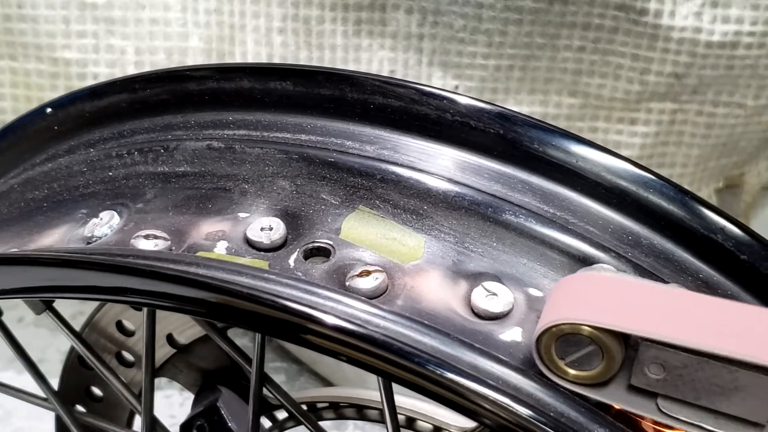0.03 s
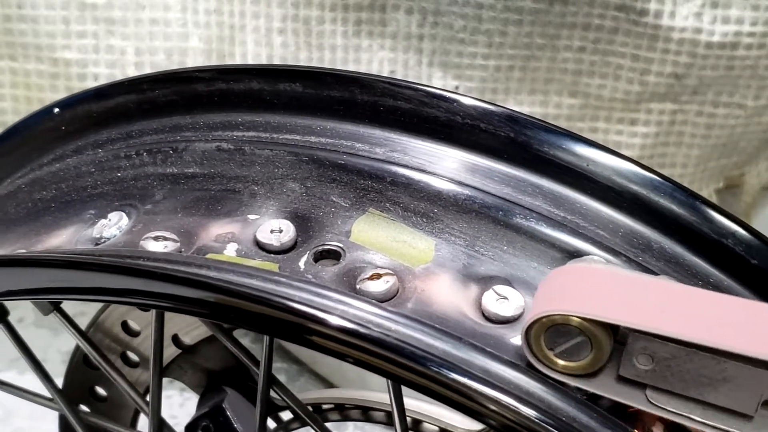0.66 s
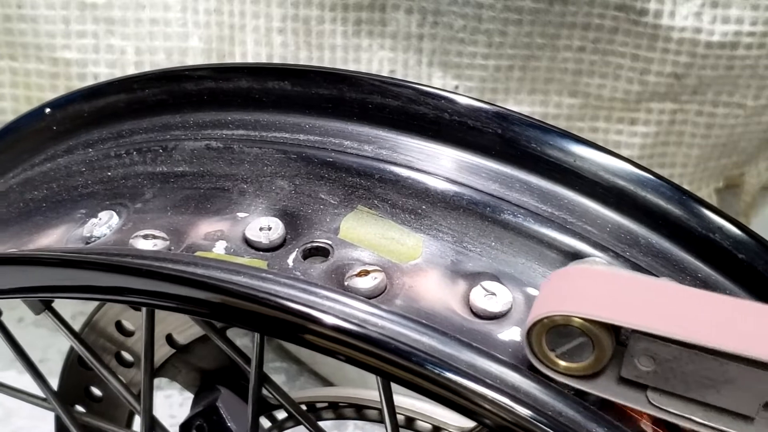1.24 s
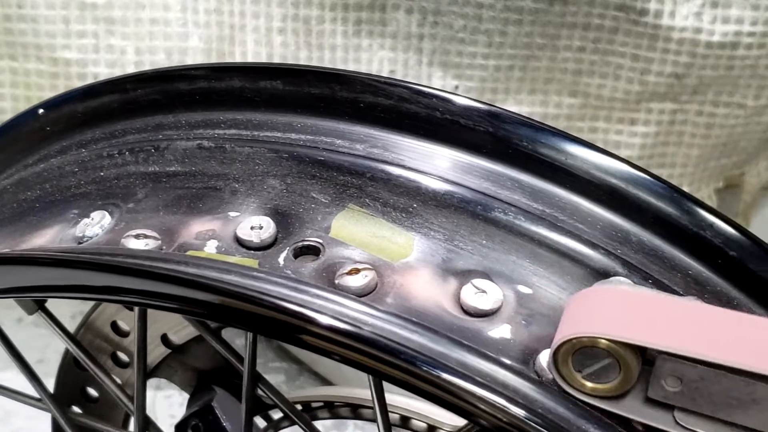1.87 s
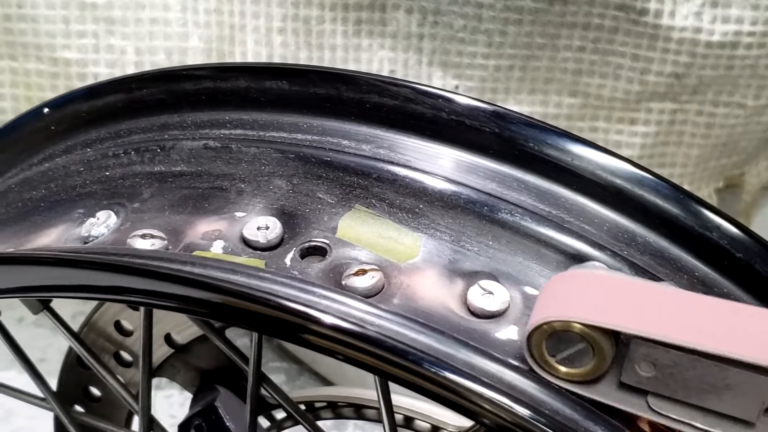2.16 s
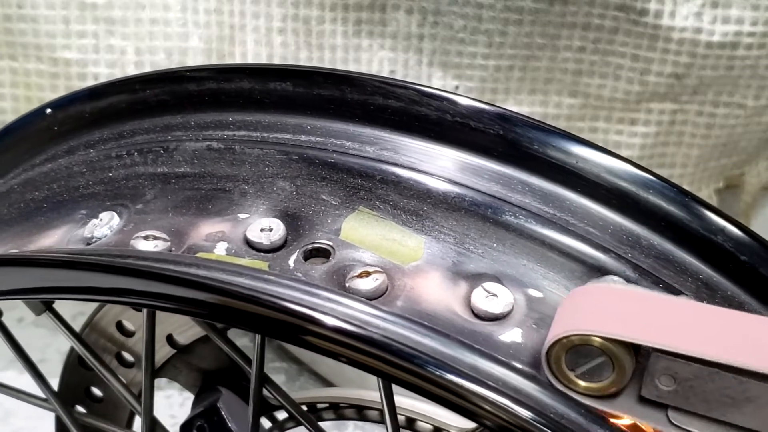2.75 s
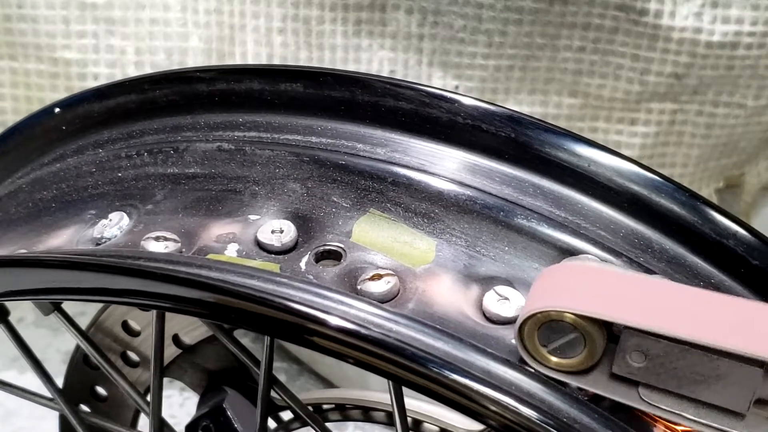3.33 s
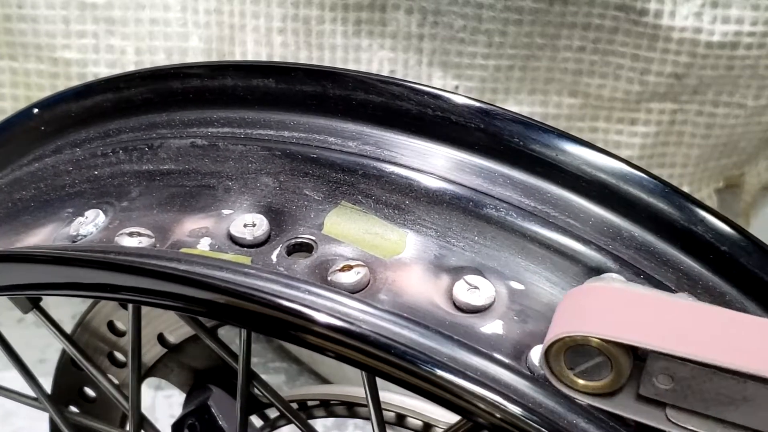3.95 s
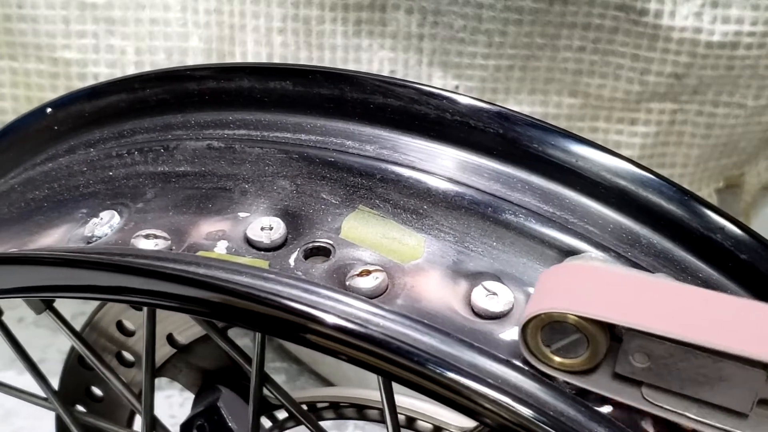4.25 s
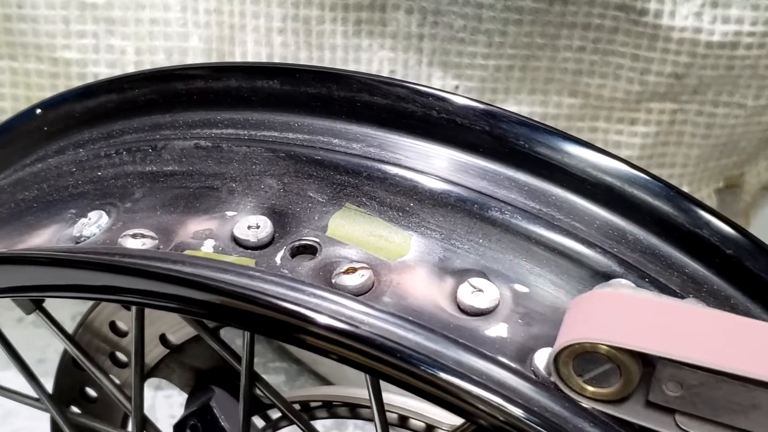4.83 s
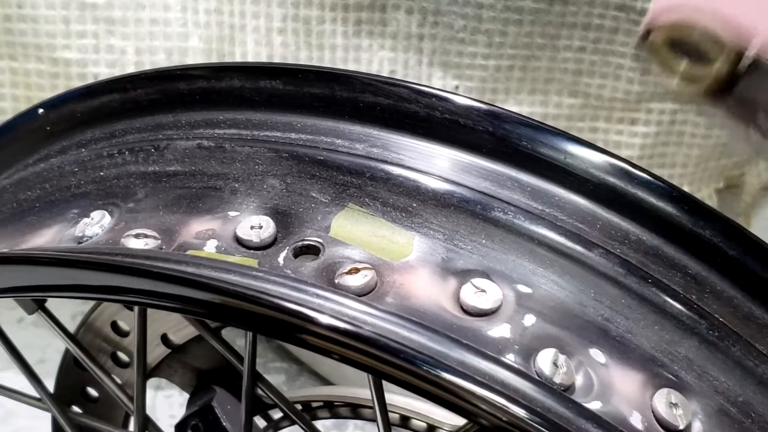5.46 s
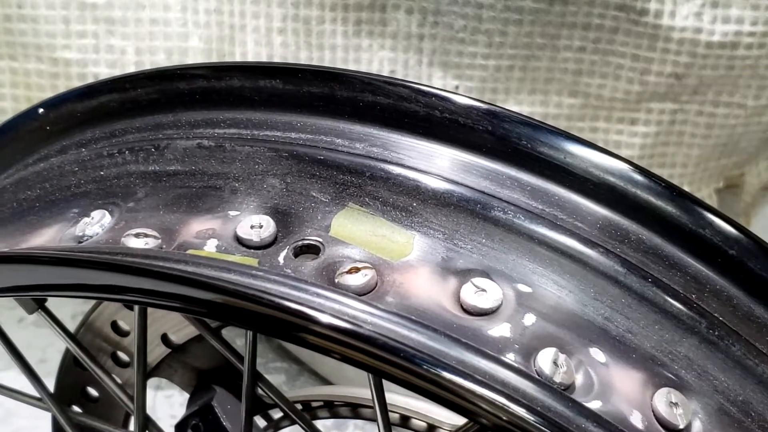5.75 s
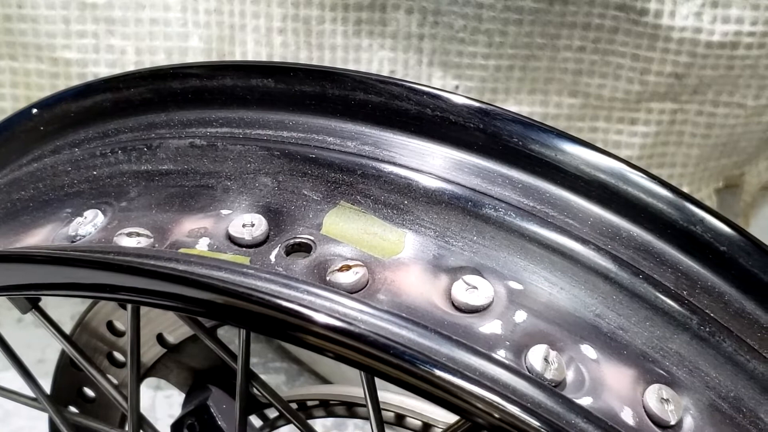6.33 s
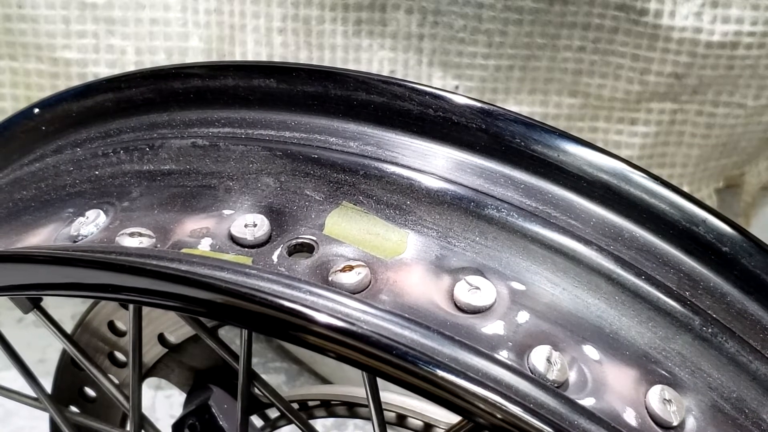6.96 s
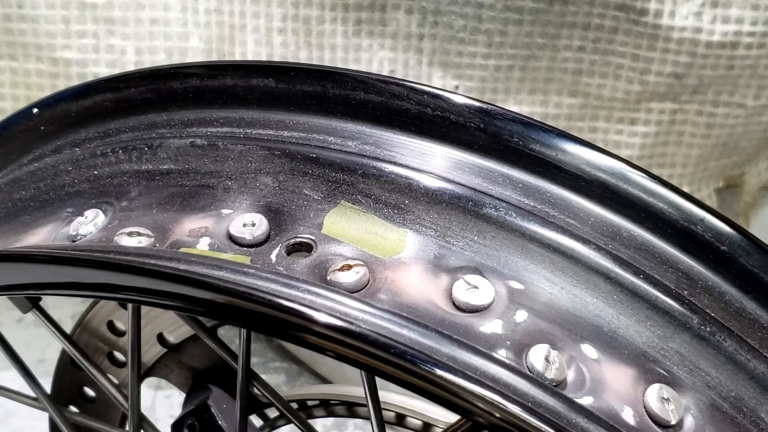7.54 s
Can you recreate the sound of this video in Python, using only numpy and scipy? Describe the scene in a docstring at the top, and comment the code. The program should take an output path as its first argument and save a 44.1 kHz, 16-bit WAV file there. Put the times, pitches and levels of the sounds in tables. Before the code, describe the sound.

In a workshop, a hand-held air belt sander grinds steel spoke heads in a wheel rim, close to the microphone. It hisses and scrapes in uneven strokes, with metallic ringing and a few thin squeals, while the motor's whine sinks under load. After about five seconds the belt lifts and the motor stops with a brief hoot. A fan drones on behind, slowly growing louder.

```python
"""A workshop, in stereo: a hand-held air belt sander close to the microphone, a fan droning behind it.
From the start the vane motor whines and buzzes, the exhaust rushes, and the belt grinds steel spoke
heads in a motorcycle rim. With each stroke the grit scrapes and the steel rings; the motor sags under
load. At 5.2 s the belt is lifted off, then the trigger is let go and the motor runs down with a brief
hoot. From 5.9 s the recorder's automatic gain recovers, lifting the steady fan drone."""
import sys
import numpy as np
from scipy import signal
from scipy.fft import rfft, irfft
from scipy.io import wavfile

SR = 44100
rng = np.random.default_rng(int(sys.argv[2]) if len(sys.argv) > 2 else 0)


def dump_mix(stems):
    """Bounce the given channels to the path in sys.argv[1] as a 16-bit WAV at rate SR."""
    frames = np.atleast_2d(stems).T  # one column per channel
    limited = np.clip(frames, -1, 1)  # hard clip at full scale
    pcm = np.round(limited * 32767).astype(np.int16)
    wavfile.write(sys.argv[1], SR, pcm)


N = 335160
TIME, FREQS = np.arange(N) / SR, np.maximum(np.arange(N // 2 + 1) * SR / N, 1)
LIFT_OFF_S, RELEASE_S, GAIN_RECOVERY_S = 5.21, 5.35, 5.92


def from_db(db):
    """Decibels to gain."""
    return 10 ** (np.asarray(db) / 20)

def unit_rms(x):
    """Scale to unit power."""
    return x / np.sqrt(np.mean(x ** 2) + 1e-20)

def since(s):
    """Seconds gone by after a moment; 0 before it."""
    return np.maximum(TIME - s, 0)

def ramp(s, length_s):
    """An even rise from 0 to 1, starting at a moment."""
    return np.minimum(since(s) / length_s, 1)

def swell(s, rise_s, fall_s, hold_s=0):
    """An even rise to 1 at a moment, a hold, and an even fall."""
    return np.interp(TIME, [s - rise_s, s, s + hold_s, s + hold_s + fall_s], [0, 1, 1, 0])

def arches(rows):
    """Rounded dips or rises of level in dB, one for each row."""
    return sum(db * np.cos(np.pi / 2 * np.clip((TIME - s) / half_s, -1, 1)) for s, half_s, db in rows)

def in_time(rows):
    """Each column of a curve, sample by sample."""
    s, *columns = np.transpose(rows)
    return [np.interp(TIME, s, column) for column in columns]

def in_frequency(points):
    """A table joined by straight lines over log frequency."""
    hz, value = np.transpose(points)
    return np.interp(np.log(FREQS), np.log(hz), value)

def drift(rate_hz):
    """A random wander of rms 1, mostly slower than the given rate."""
    return unit_rms(irfft(rfft(rng.standard_normal(N)) / (1 + (FREQS / rate_hz) ** 2) ** 1.26, N))

def bump(hz, centre_hz, width_hz, db):
    """Gain of a single resonant lift."""
    return from_db(db / (1 + (2 * (hz - centre_hz) / width_hz) ** 2))

def panned(db):
    """Channel gains for a pan, given as left minus right level."""
    return from_db(np.array([[.5], [-.5]]) * db)

def noise_pair(likeness, left_lag_s=0.00026, scatter_rad=1.28):
    """Noise spectra at the microphone, partly alike: the left mids lag, the treble phase scatters."""
    alike = np.clip(in_frequency(likeness), 0, 1)
    shared, left, right = rfft(rng.standard_normal((3, N)))
    lag = 2 * np.pi * np.minimum(FREQS * left_lag_s, 1) / (1 + (480 / FREQS) ** 6)
    knots_hz = np.arange(0, SR / 2, 250)
    offsets = rng.normal(0, scatter_rad, len(knots_hz)) * (knots_hz * left_lag_s > 1)
    shared_left = shared * np.exp(-1j * (lag + np.interp(FREQS, knots_hz, offsets)))
    return np.sqrt(alike) * np.array([shared_left, shared]) + np.sqrt(1 - alike) * np.array([left, right])

def coloured(spectra, points):
    """Turn a pair of spectra into sound of a given colour; rms 1."""
    return unit_rms(irfft(spectra * from_db(in_frequency(points)), N))

def resonating(spectra, modes):
    """Pass a pair of spectra through parallel resonances, each radiating its own way; rms 1."""
    response = sum(from_db(db) * panned(pan_db) / (1 + 1j * (FREQS ** 2 - hz ** 2) / (FREQS * width))
                   for hz, width, db, pan_db in modes)
    return unit_rms(irfft(spectra * response, N))

def reflections(x, share, spread_s, count=40, places=10):
    """Add echoes off the wheel and nearby surfaces, shifting as the tool moves from place to place."""
    echoes = 0
    for place in range(places):
        delay = rng.uniform(.15, 1, count)
        strength = unit_rms(rng.choice([-1, 1], count) * np.exp(-delay)) / np.sqrt(count)
        taps = np.zeros(int(spread_s * SR) + 1)
        taps[(delay * spread_s * SR).astype(int)] = strength
        nearness = np.sqrt(np.clip(1 - abs(TIME / TIME[-1] * (places - 1) - place), 0, 1))
        echoes = echoes + nearness * signal.oaconvolve(x, taps[None], axes=1)[:, :N]
    return (x + share * echoes) / np.sqrt(1 + share ** 2)


# how alike the fan is on the two sides of the microphone: f/Hz, likeness/0-1
FAN_LIKENESS = [(60, 0.98), (150, 0.94), (290, 0.8), (420, 0.57), (700, 0.15), (1300, 0.86), (2200, 0.43),
                (4000, 0.08), (15000, 0)]
# spectra of the duct's rumble and of the moving air: f/Hz, level/dB
RUMBLE_SPECTRUM = [(20, -29), (40, -33), (56, -4.5), (66, -16.5), (80, -16), (105, -9.5), (138, 0),
                   (150, -1.5), (164, 1.6), (184, -2.5), (205, -4), (245, -5.5), (266, -8), (292, -2),
                   (330, -17), (500, -26.5), (1000, -47.5)]
AIR_SPECTRUM = [(40, -38), (150, -32), (330, -26), (430, -4), (520, -2), (680, -2), (920, -2.5),
                (1030, -7.5), (1250, -4.5), (1600, -8), (3200, -13), (6200, -22.5), (9400, -26),
                (15800, -19)]
# hollow resonances of the duct: f/Hz, width/Hz, lift/dB
DUCT_MODES = [(480, 25, 2), (661, 41, 5), (760, 50, 2), (890, 77, 5), (1220, 40, 2)]
# short lumps in the rumble, and late surges in the air's midrange: t/s, half length/s, lift/dB
RUMBLE_THROBS = [(.54, .04, 3), (1.36, 0.029, 3.5), (1.45, .035, 1), (2.25, 0.024, 3), (2.63, .04, 3.5),
                 (3.45, .04, 3), (4.03, 0.032, 4), (4.66, .035, 4), (6.36, 0.033, 3), (7.31, .035, 2),
                 (7.43, 0.031, 2.5)]
AIR_SURGES = [(6.23, .05, 0), (6.42, .05, 2.5), (6.8, .04, 3), (6.97, 0.12, 3), (7.28, 0.046, 1),
              (7.44, .04, 2.5), (7.58, 0.045, 2)]
# tones of the fan: f/Hz, level/dB against the air before the gain recovers
FAN_TONES = [(225.5, -4), (450, -13.5), (564, -17.5), (663, -21.5), (1822, -21.5), (1923, -16.5),
             (2024, -24.5), (2734, -24)]

def fan(rumble_db=-27, air_db=-33, left_lag_s=0.00014):
    """In the background a duct rumbles and throbs under surging air and faint, wavering tones."""
    recovering_s = since(GAIN_RECOVERY_S)   # the recorder's gain comes back, as set ramps in dB/s
    rumble_gain = from_db(rumble_db + 3.5 * recovering_s + arches(RUMBLE_THROBS))
    rumble = rumble_gain * coloured(noise_pair(FAN_LIKENESS), RUMBLE_SPECTRUM)
    hollow = np.prod([bump(FREQS, *mode) for mode in DUCT_MODES], axis=0)
    airflow = coloured(noise_pair(FAN_LIKENESS) * hollow, AIR_SPECTRUM)
    midrange = irfft(rfft(airflow) / (1 + ((FREQS - 794) / 350) ** 2), N)
    surges = (from_db(arches(AIR_SURGES)) - 1) * midrange
    air = from_db(air_db + 4 * recovering_s) * (airflow + surges)
    arrival = TIME - np.array([[left_lag_s], [0]])
    tones = sum(from_db(db + 1.86 * drift(11)) * np.sin(2 * np.pi * hz * arrival + 0.64 * drift(4.6))
                for hz, db in FAN_TONES)
    return rumble + air + from_db(air_db + 2.5 * recovering_s) * np.sqrt(2) * tones


# speed of the motor under load: t/s, vane rate/Hz
VANE_RATE = [(0.0, 659.5), (0.39, 658.8), (0.76, 636.6), (1.05, 635.7), (1.62, 616), (1.72, 617.6),
             (1.94, 632.6), (2.56, 598), (2.96, 603.2), (3.55, 575.1), (3.72, 575.7), (3.88, 599),
             (3.96, 599.4), (4.3, 579.3), (4.57, 567.3), (4.73, 575.7), (4.84, 586.5), (5.16, 577.5),
             (5.23, 586), (5.3, 612), (5.33, 619)]

def motor_speed(coast_hz_per_s=1850):
    """Vane rate and phase: the motor sags under load and coasts down once the trigger is let go."""
    vane_hz = np.maximum(in_time(VANE_RATE)[0] - coast_hz_per_s * since(RELEASE_S), 0)
    return vane_hz, 2 * np.pi * np.cumsum(vane_hz * (1 + 0.0012 * drift(33))) / SR

def dying(length_s):
    """A fade that gathers pace, 60 dB down this long after the trigger is let go."""
    return np.exp(-np.log(1000) * np.minimum(since(RELEASE_S) / length_s, 2) ** 2)


# the whine at the microphone as the tool is loaded and moved about: t/s, level/dB, pan/dB
WHINE_AT_MIC = [(0.1, -30, -4), (.35, -33, -2), (.7, -29.5, 1), (1.1, -29.5, 3.5), (1.4, -28.5, 4.5),
                (1.65, -24, 0), (1.9, -29, 4.5), (2.12, -27.5, 4), (2.42, -24.5, -4), (3.02, -26, -4.5),
                (3.45, -24, -1), (3.62, -23, 2), (3.92, -25, -4), (4.5, -23.5, 0.5), (5.24, -24.5, -1)]
# weaker partials of the motor: multiple of the vane rate, level/dB against the whine
WHINE_OVERTONES = [(1.75, -25.5), (3, -24.5), (3.25, -27.5)]
HOOT_S, HOOT_RISE_S, HOOT_HOLD_S, HOOT_FALL_S, HOOT_DB = 5.365, .006, .018, .034, 16.5

def whine(vane_phase, vane_hz, flutter_db=0.67):
    """Air puffs from the vanes make a near-pure tone that chokes and hoots as the valve closes."""
    coasting = ramp(HOOT_S + HOOT_HOLD_S, HOOT_FALL_S)
    stumble_rad = coasting * .22 * drift(70)   # slack vanes rattle, so the falling tone is ragged
    sputter = from_db(coasting * 2.5 * drift(110))

    def partial(multiple, left_lag_s=0.00032):
        """One fluttering partial, reaching the left channel late."""
        lag = 2 * np.pi * vane_hz * left_lag_s * np.array([[1], [0]])
        flutter = from_db(flutter_db * np.sqrt(multiple) * drift(21))
        return np.sqrt(2) * np.sin(multiple * (vane_phase - lag) + stumble_rad) * flutter

    heard_db, pan_db = in_time(WHINE_AT_MIC)
    choke_db = -10.5 * swell(RELEASE_S, rise_s=0.08, fall_s=0.08)
    hoot_db = HOOT_DB * swell(HOOT_S, HOOT_RISE_S, HOOT_FALL_S, HOOT_HOLD_S)
    octave_db = -50.5 + 14 * coasting + 1.6 * drift(6.6)   # coasting vanes sound more hollow
    tone = partial(1) * panned(pan_db)
    tool_resonance = bump(2 * vane_hz, centre_hz=1197, width_hz=190, db=14.2)
    octave = from_db(octave_db) * tool_resonance * partial(2) * panned(-10.5)
    for multiple, db in WHINE_OVERTONES:
        housing_resonance = bump(multiple * vane_hz, centre_hz=1780, width_hz=16, db=11.2)
        tone += from_db(db) * housing_resonance * partial(multiple, left_lag_s=0.00044)
    tone *= from_db(heard_db + choke_db + hoot_db)
    return sputter * (dying(0.27) * tone + dying(0.56) * octave)


# partials of the rotor's metallic buzz: multiple of the shaft rate, relative level/dB
ROTOR_ORDERS = [(14, -6), (15, -8), (16, -8), (17, -6), (19.44, -3), (20, -6), (21, -1), (22, -2.5),
                (23, -6), (24, 0), (25, -2), (26, -3), (27, -6), (28, -2.5), (31, -8), (32, -7), (34, -5.5),
                (36, -1.5), (42, -7), (43, -5.5), (44, -4.5), (47, -4)]

def rotor(vane_phase, vanes=4, level_db=-48, waver_db=2.5):
    """Rotor and bearings buzz; nearby echoes make each partial come and go as it glides."""
    buzz = sum(np.sqrt(2) * from_db(db) * np.sin(order * vane_phase / vanes + rng.uniform(0, 2 * np.pi))
               for order, db in ROTOR_ORDERS)
    buzz *= from_db(level_db + waver_db * drift(25))
    return np.vstack([reflections(buzz[None], share=1, spread_s=.012, places=4) for side in range(2)])


# how alike the close tool is on the two sides of the microphone: f/Hz, likeness/0-1
TOOL_LIKENESS = [(600, 0.78), (2000, 0.35), (4000, 0.28), (8000, 0.22), (15000, 0.38)]
# spectrum of the exhaust: f/Hz, level/dB
EXHAUST_SPECTRUM = [(100, -34), (350, -3), (475, 3), (550, -5), (900, -32), (1020, -6), (1300, -5.5),
                    (1500, -9), (1850, -2.5), (2250, -12.5), (2850, -8), (3200, -2.5), (4100, -1),
                    (4700, -3.5), (6200, -6), (7050, -0.5), (8600, -6.5), (16000, -20)]

def exhaust(level_db=-29.5, start_lift_db=3, settle_s=1):
    """Spent air rushes out of the tool, a little louder at first."""
    rush = coloured(noise_pair(TOOL_LIKENESS), EXHAUST_SPECTRUM)
    gain = from_db(level_db + start_lift_db * np.exp(-TIME / settle_s))
    return gain * reflections(rush, share=0.78, spread_s=.024)

def grit(grain_db, chatter_db):
    """Countless grains bite the steel, some harder than others."""
    return irfft(noise_pair(TOOL_LIKENESS), N) * from_db(grain_db * drift(1100) + chatter_db * drift(50))

def lifted():
    """How far the belt has left the steel, from 0 to 1."""
    return ramp(LIFT_OFF_S, length_s=0.062)


# strokes over a spoke head: peak t/s, rise/s, fall/s, scrape/dB, sizzle/dB, ring of the head/dB
STROKES = [(.1, .1, .15, -2, 1.5, 0), (.36, 0.097, 0.089, 1.5, 7, 2), (.62, 0.14, 0.21, 5, 3.5, 10),
           (.76, 0.13, 0.18, -1.5, 1, 11), (1.16, 0.11, .09, 0, 4, 0), (1.33, 0.12, 0.1, 7.5, 6.5, 8),
           (1.42, 0.1, 0.086, 8.5, -5, 4), (1.5, 0.069, 0.1, 8.5, 5, 4), (1.61, 0.086, 0.072, 2, 3.5, 7),
           (2.3, 0.18, 0.16, 6.5, 6.5, 8), (2.49, 0.2, 0.19, 2, 2, 16.5), (2.94, 0.053, .2, 0.5, 2.5, 2),
           (3.34, 0.18, 0.24, 7, 4.5, 0), (3.67, 0.084, .05, 1.5, 4.5, 0), (3.88, 0.068, 0.097, 4, 2, 0),
           (4.04, .06, .14, 0, 1, 0), (4.38, 0.15, 0.23, 7, 4, 4), (4.55, 0.074, 0.069, 3, 4, 3),
           (4.87, 0.14, .15, 2.5, 1, 2), (5.05, .04, .04, 1.5, 0, 0), (5.13, 0.12, 0.059, 5.5, 3, 3),
           (5.21, 0.069, 0.064, 5.5, -3, 12)]
# the belt eases off between strokes, mostly thinning the sizzle: t/s, half length/s, change/dB
EASINGS = [(1.02, .09, 0.5), (1.8, 0.029, -6), (1.98, .08, -2), (2.85, 0.1, -2.5), (3.82, .05, -3)]
# spectra of the belt's scrape and of its high sizzle: f/Hz, level/dB
SCRAPE_SPECTRUM = [(3000, -35), (4800, -7), (6400, -4.5), (7400, -3), (8700, -3), (9700, -3.5),
                   (11300, -2.5), (13000, -4.5), (16000, -28)]
SIZZLE_SPECTRUM = [(8000, -37), (11000, -5), (11700, -4.5), (12020, 1), (12300, -2), (13000, 4.5),
                   (13750, -1), (14150, 0), (14450, 5), (14900, 3.5), (15600, 2.5), (15800, 0)]
# steel ringing under the grit, rim and spoke heads: f/Hz, width/Hz, relative level/dB, pan/dB
RIM_MODES = [(5170, 60, -5, 2), (5420, 50, -6, 3), (5780, 70, -4.5, -3), (6300, 60, -3.5, -4),
             (7050, 60, -4, 0), (7550, 45, 1, 6), (7945, 28, 3, 1), (8230, 50, -2, -2), (8560, 45, 0, -3),
             (9000, 130, -2, -8), (9520, 80, -1, -8), (10280, 70, -1, 2), (10600, 100, -5, -7),
             (11030, 80, -5, 7), (11450, 70, -4, 7), (11780, 110, -2, 0), (12500, 150, -1, -3),
             (13520, 100, -1, 2), (14330, 150, -1, -7), (15230, 170, 1, -10)]
HEAD_MODES = [(12790, 70, 0, -4), (12950, 160, -5, -4), (13280, 180, -8, -3)]
LIFTED_SCRAPE_DB, LIFTED_SIZZLE_DB, LIFTED_HEADS_DB = -8, -9.5, 15   # changes as the belt lifts off

def grinding(vane_phase, vanes_per_belt_lap=12.5, resting_scrape_db=-30, resting_sizzle_db=-21):
    """Close up, the belt scrapes and sizzles; pressing harder makes the rim ring in rough bursts."""
    pressed_db = sum(np.outer(gains_db, swell(s, rise, fall)) for s, rise, fall, *gains_db in STROKES)
    lifted_db = np.outer([LIFTED_SCRAPE_DB, LIFTED_SIZZLE_DB, LIFTED_HEADS_DB], lifted())
    scrape_db, sizzle_db, heads_db = pressed_db + lifted_db
    joint = np.cos(vane_phase / vanes_per_belt_lap)   # the belt's joint comes round once a lap
    throb = 1 + 0.083 * joint
    cutting = grit(grain_db=1.5, chatter_db=1.03) * throb
    skimming = reflections(grit(grain_db=2.5, chatter_db=1.5), share=0.62, spread_s=.025) * throb
    knocking = rfft(grit(grain_db=-2, chatter_db=1.4))   # coarser grains set the steel ringing
    ring_on_db = 6 * ramp(RELEASE_S, length_s=0.074)   # the steel rings on once the belt is off
    rim_db = -7 + 0.96 * np.clip(scrape_db, 0, 9) + ring_on_db
    rim = from_db(rim_db) * resonating(knocking, RIM_MODES) * (1 + 0.15 * joint)
    heads = from_db(-20.5 + heads_db + ring_on_db) * resonating(knocking, HEAD_MODES)
    scrape = coloured(rfft(cutting), SCRAPE_SPECTRUM) * panned(-0.71)
    sizzle = coloured(rfft(skimming), SIZZLE_SPECTRUM) * panned(-3.5)
    return (from_db(resting_scrape_db + scrape_db) * (scrape + rim)
            + from_db(resting_sizzle_db + sizzle_db + arches(EASINGS)) * (sizzle + heads))


# notes that a spoke head sings on: f/Hz, width/Hz, relative level/dB, pan/dB
SINGING_MODES = [(3075, 14, 2, -3), (4413, 18, 0, -5), (5160, 110, -7, 0), (5590, 70, -9, 0)]
# clean squeals of a spoke head: t/s, hold/s, level/dB
SQUEALS = [(.165, .02, -44), (.29, .09, -41), (0.478, .04, -37), (1.137, 0.044, -31), (2.93, .07, -44),
           (3.09, .03, -36), (3.334, .02, -39), (4.102, 0.065, -39.5), (4.82, .02, -47), (4.91, .02, -44),
           (5.18, .025, -37)]

def singing(ring_db=-38.5, waver_db=3.5, waver_rad=0.55):
    """Grit keeps a spoke head ringing faintly; in a squeal its lowest note locks into a clean tone."""
    ring = resonating(noise_pair(TOOL_LIKENESS), SINGING_MODES)
    locked = sum(from_db(db) * swell(s, rise_s=0.051, fall_s=.04, hold_s=hold) for s, hold, db in SQUEALS)
    phase = 2 * np.pi * SINGING_MODES[0][0] * TIME + waver_rad * np.array([drift(17), drift(15)])
    squeal = locked * from_db(waver_db * drift(30)) * np.sqrt(2) * np.sin(phase)
    return from_db(ring_db + LIFTED_SCRAPE_DB * lifted()) * ring + squeal


# the belt catches an edge: peak t/s, rise/s, fall/s, f/Hz, width/Hz, level/dB
EDGE_CATCHES = [(.36, .05, .05, 10800, 2000, -28), (1.43, .12, .1, 7945, 30, -28.5),
                (3.87, 0.054, .06, 9300, 2000, -28), (4.39, .09, .12, 7560, 300, -32),
                (5.13, .06, .09, 7520, 160, -28), (5.17, .07, .07, 12500, 200, -28),
                (5.195, .085, 0.057, 5650, 1300, -25), (5.205, .04, 0.032, 6250, 120, -34)]

def edge_flares():
    """Where the belt catches an edge, one resonance of the contact flares up."""
    catching = rfft(grit(grain_db=-1, chatter_db=4.5))
    return sum(from_db(db) * swell(s, rise_s, fall_s) * resonating(catching, [(hz, width, 0, 0)])
               for s, rise_s, fall_s, hz, width, db in EDGE_CATCHES)

def sander(fade_db_per_s=81):
    """Motor, exhaust and belt on steel; all of it dies away once the trigger is let go."""
    vane_hz, vane_phase = motor_speed()
    motor = whine(vane_phase, vane_hz)
    working = grinding(vane_phase) + exhaust() + edge_flares() + rotor(vane_phase) + singing()
    return motor + from_db(-fade_db_per_s * since(RELEASE_S)) * working

def scene():
    """The sander close to the microphone, the fan farther back in the workshop."""
    return sander() + fan()

def record(dry, cutoff_hz=15760):
    """The microphone port resonates in the treble; the top is cut steeply."""
    port = bump(FREQS, centre_hz=8080, width_hz=780, db=5.6)
    top_cut = np.clip((cutoff_hz - FREQS) / 60 + .5, 0, 1)
    return irfft(rfft(dry) * port * top_cut, N)


dry = scene()
out = record(dry)
dump_mix(out)
```